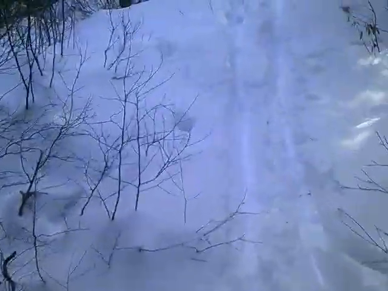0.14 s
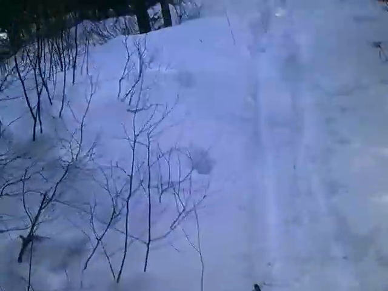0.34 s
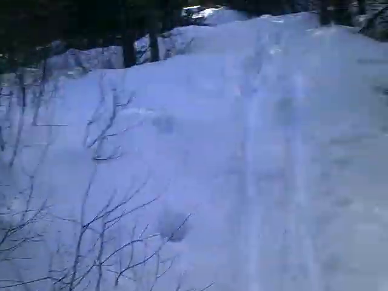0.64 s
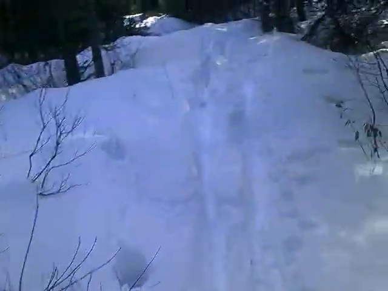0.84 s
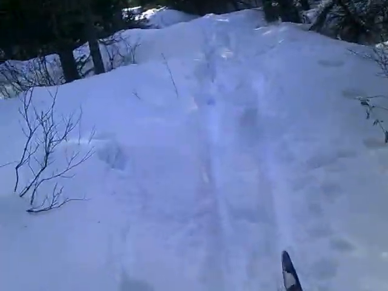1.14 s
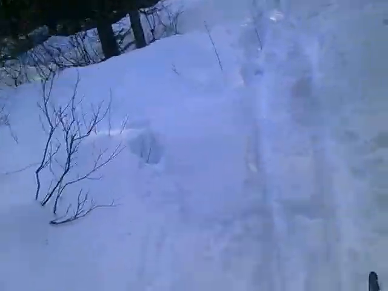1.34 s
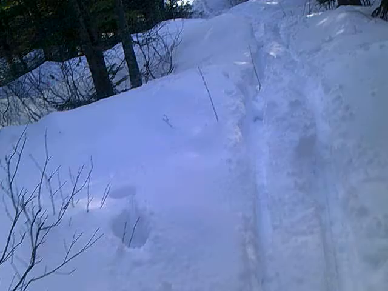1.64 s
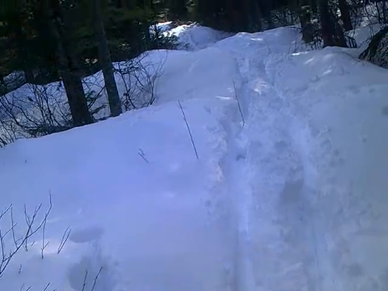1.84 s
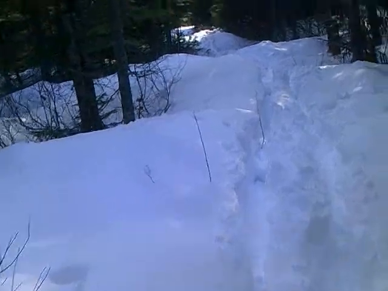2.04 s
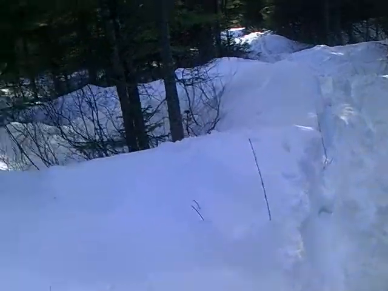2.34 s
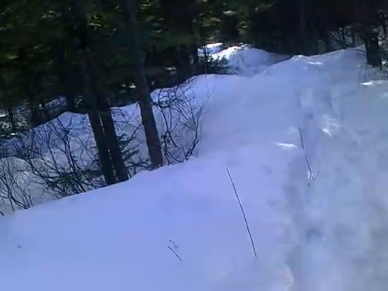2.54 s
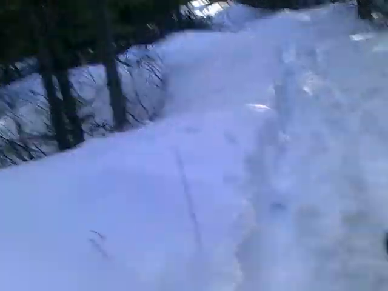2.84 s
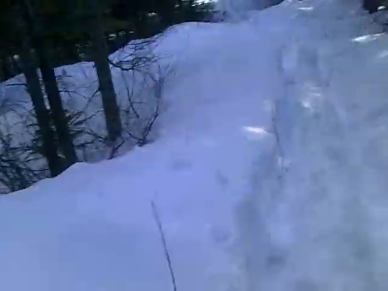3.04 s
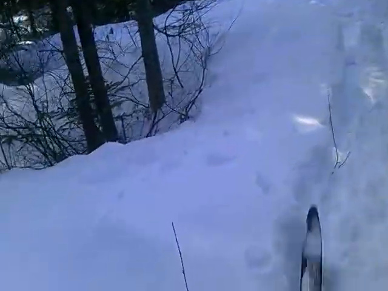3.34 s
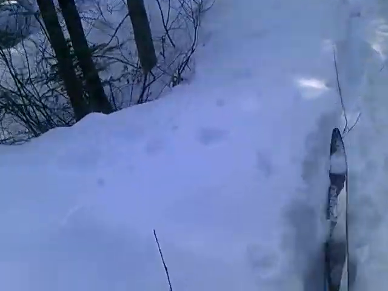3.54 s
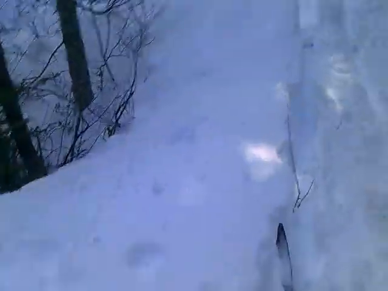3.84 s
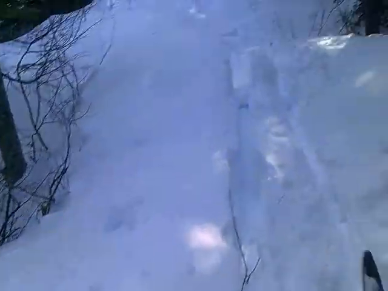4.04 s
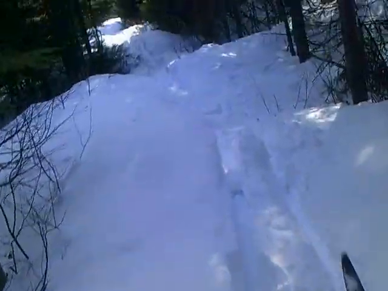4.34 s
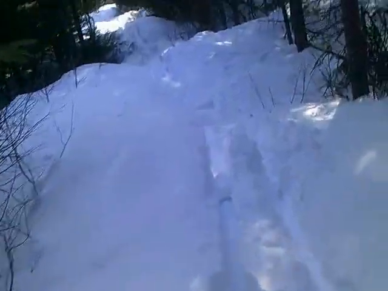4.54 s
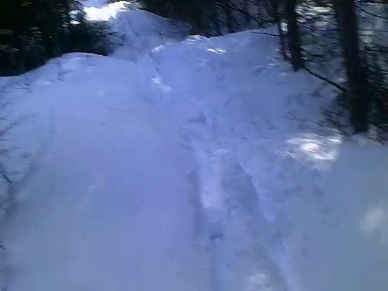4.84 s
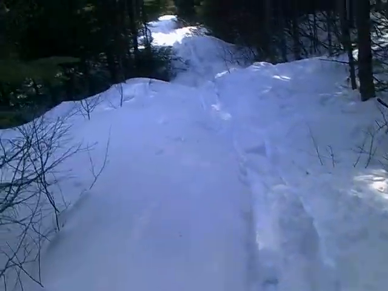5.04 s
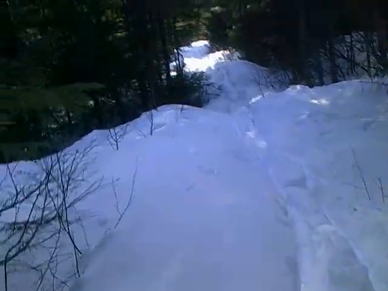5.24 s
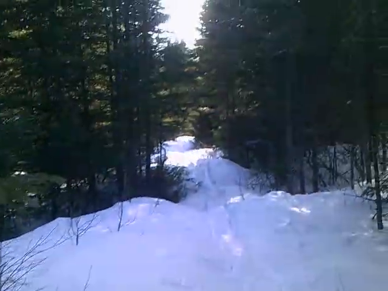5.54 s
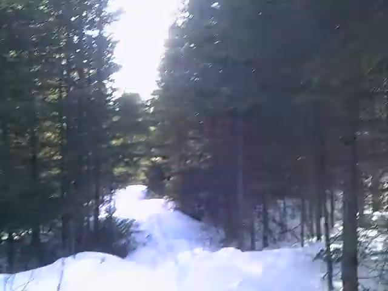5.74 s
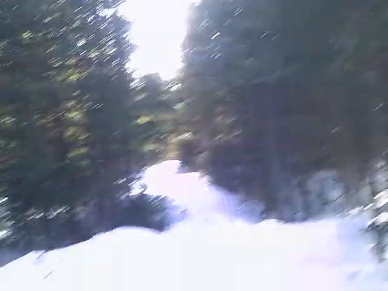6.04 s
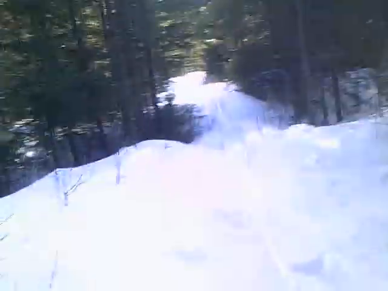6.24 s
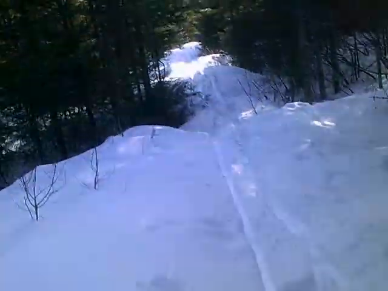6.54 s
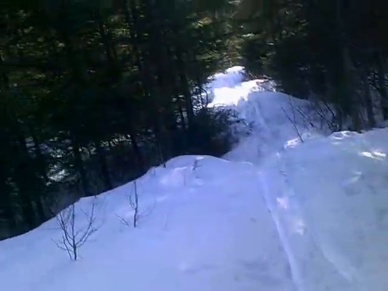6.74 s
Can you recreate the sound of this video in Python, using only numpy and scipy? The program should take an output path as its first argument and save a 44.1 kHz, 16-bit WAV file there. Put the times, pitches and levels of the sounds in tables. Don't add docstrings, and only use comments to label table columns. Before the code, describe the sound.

Muffled snow crunches underfoot while a loose strap and buckle snap, slap and scrape hard against a body-worn plastic camera housing.

```python
import sys
import numpy as np
from scipy import signal
from scipy.fft import rfft, irfft
from scipy.io import wavfile
from scipy.ndimage import uniform_filter1d

SR = 44100
rng = np.random.default_rng(int(sys.argv[2]) if len(sys.argv) > 2 else 0)


def unload_wav(signal):
    wavfile.write(
        sys.argv[1],
        SR,
        np.round(np.clip(np.atleast_2d(signal).T, -1, 1) * 32767).astype(np.int16),
    )


def voltage_ratio(level):
    return 10 ** (np.asarray(level, float) / 20)


N = 303496
TIME = np.arange(N) / SR

# [t/s, level/dB, crispness/dB]
SNOW_WEIGHT = [(0, -48.5, 8), (0.5, -36, 0), (0.9, -50, 3), (1.24, -38.5, -4), (1.48, -51, 5),
               (2.03, -38.5, -5), (2.64, -52.5, 8), (2.84, -32, -3), (3.04, -49, -1), (3.3, -44.5, 2),
               (3.68, -38.5, -3), (4.0, -46.5, 4), (5.1, -38.5, -2), (5.6, -40.5, 2.5), (5.82, -49, -2.2),
               (6.1, -39, 2.5), (6.45, -50.5, -0.5), (6.88, -47, 3.5)]
# [t/s, length/s, change/dB]
CRUNCH_SWELLS = [(0, .04, 6), (.55, .11, 5), (.93, .06, -7), (1.3, .05, -5), (1.45, .05, 4),
                 (2.21, .11, -6), (2.5, .08, -4), (3.31, .07, 5), (4.12, .14, -3), (4.46, .09, -3),
                 (4.77, .03, 6), (4.93, .06, 3), (5.16, .26, 3.5), (5.5, .09, -4), (5.72, .1, -3),
                 (6.4, .03, 4), (6.44, .06, -4)]
# [f/Hz, level/dB per Hz]
MUFFLE = [(150, -40), (250, -3.5), (460, 4.5), (540, 0.5), (840, 2.5), (970, -2), (1060, 1), (1290, -1),
          (1750, -14), (2280, -18.5), (3400, -22.5), (3900, -35), (5000, -47.5), (6000, -93)]
# [f/Hz, level/dB per Hz]
HISS = [(5000, -58.5), (5900, -3.5), (6800, 13), (7400, 11), (8100, 4), (9000, -50.5)]
# [t/s, level/dB]
AIR_PRESSURE = [(0, -14.5), (0.25, -38), (0.42, -20.5), (0.8, -37), (1.2, -25.5), (1.59, -41), (1.9, -30.5),
                (2.43, -30.5), (2.56, -40), (2.9, -16.5), (3.12, -36.5), (3.64, -23), (4.1, -38.5),
                (4.6, -24), (5.2, -31.5), (5.9, -33), (6.3, -23.5), (6.7, -39)]
# [t/s, change/dB, release/s]
LURCHES = [(0.535, 14.5, 0.06), (1.098, 4, .2), (1.859, 11.5, 0.049), (2.07, 25.5, 0.047),
           (2.759, 14.5, 0.087), (3.66, 14.5, 0.1), (4.551, 7.5, 0.073), (4.95, 2.5, .1),
           (5.269, 11, 0.083), (5.62, 9, .07), (3.22, 10.5, 0.091), (4.4, 11, .06), (6.2, -1, .2),
           (6.75, 7, .1), (.03, 4, .1), (.82, -5, .06), (2.25, -6, .12), (2.17, 5, .03), (3.9, -5, .05),
           (4.05, 8, .05), (4.2, -6, .12), (5.5, 7, .06), (.47, -6, .03)]
# [f/Hz, level/dB per Hz]
SWAY = [(2.4, -30), (5, -2), (14, -1.5), (24, -9), (33, -19.5), (48, -15.5), (70, -39.5)]
# [f/Hz, level/dB per Hz]
THUMP = [(18, -26.5), (40, -6.5), (75, -4.5), (170, -10), (330, -18), (700, -80.5)]
# [f/Hz, level/dB, t60/s]
HOUSING_MODES = [(520, -8, 0.019), (657, -10.5, 0.058), (780, -9.5, 0.042), (903, -4.5, 0.035),
                 (1101, -10, 0.054), (1263, -17.5, 0.059), (1400, -19, 0.03), (900, 6.5, 0.0044),
                 (1850, 2.5, 0.0082), (1565, -18, 0.052), (1629, -4.5, 0.016), (1831, -13.5, 0.022),
                 (2161, -4.5, 0.013), (2369, -9, 0.018), (2800, -17, 0.011), (3383, -14, 0.011),
                 (4500, -20, 0.0027), (6600, -27, 0.0017), (7000, -35, 0.006), (7310, -24, 0.0041)]
# [t/s, peak/dB, loudest ring f/Hz, sharpness/dB]
TAPS = [(0.0616, -27.5, 870, -10), (0.3182, -24, 530, -18), (0.4673, -37, 805, -8),
        (0.7093, -20, 1090, -11.5), (0.9095, -21.5, 976, -6.5), (1.2139, -20.5, 1230, -12),
        (1.2235, -21, 1050, -11), (1.2479, -32, 1050, -4), (1.2565, -20, 635, -24), (1.3738, -20, 870, -9),
        (1.399, -18, 920, -5), (1.8318, -22, 780, -8), (2.0443, -11.5, 1210, -5.5),
        (2.1647, -20, 1300, -30.5), (2.7078, -20.5, 706, -17), (2.8014, -20, 890, -15),
        (2.8166, -14.5, 864, -36), (2.8245, -12, 805, -5), (2.8472, -15.5, 1030, -12.5),
        (2.9568, -16, 950, -11.5), (3.0394, -21.5, 784, -19), (3.2725, -17.5, 500, -9.5),
        (4.1217, -23.5, 900, -18.5), (4.6558, -23, 970, -4), (5.4559, -18, 1290, -19),
        (5.6188, -18, 940, -12), (5.6918, -21.5, 1350, -16), (5.7108, -23, 885, -15.5),
        (6.041, -17, 660, -2.5), (6.2937, -25, 820, -12)]
# [t/s, peak/dB, loudest ring f/Hz, sharpness/dB, tick/dB]
SNAPS = [(0.4231, -7, 810, -9, -42), (0.5269, -5.5, 1170, 1, -33), (1.995, 5.5, 1106, -1, -22),
         (2.0024, -8.5, 980, -24, -50), (2.6819, -13, 906, -14.5, -37), (2.8394, -11.5, 795, -4.5, -38),
         (2.9059, 5, 1062, -18.5, -35), (2.9249, 7, 910, -6, -26), (2.9418, -9.5, 660, -19, -40.5),
         (3.4109, -6, 1070, 5, -19), (3.7071, -2.5, 525, -9, -44), (4.4054, -7, 896, -11.5, -43),
         (4.4209, -4, 556, -20.5, -44.5), (4.6308, -10, 1104, -20, -34), (4.6685, -7.5, 850, -12.5, -58),
         (5.0722, -8.5, 900, -8, -48), (5.1468, -12, 713, -8, -49), (5.6371, -16, 900, -11, -54),
         (6.2566, 9, 1000, 1, -26), (6.3233, -9, 770, -4, -25)]
# [t/s, peak/dB, loudest ring f/Hz, sharpness/dB, tick/dB]
SLAPS = [(1.0896, -2.5, 913, -6.5, -41), (1.1611, -9, 1003, -5, -32), (1.275, 2.5, 994, 1, -31),
         (1.359, -5.5, 1146, -7, -31), (1.4082, -16, 665, -14, -63), (2.0698, -1.5, 1057, -5.5, -24),
         (2.7389, 0, 1084, -.5, -22), (2.9109, -2.5, 802, -14, -40), (4.3079, -19, 840, -8, -54),
         (4.399, -12, 900, -11.5, -47), (4.6812, -13.5, 820, -4, -44), (5.212, -24, 1070, 4, -40),
         (5.268, 7, 1000, 2, -35), (6.0143, 2, 1080, -6.5, -48), (6.3384, 5.5, 835, 3.5, -18),
         (6.3487, 4, 1100, -6.5, -18)]
# [t/s, peak/dB, loudest ring f/Hz]
ZIP_TICKS = [(0.6585, -29.5, 1270), (1.3938, -18, 874), (1.592, -29, 867), (1.787, -31.5, 1240),
             (2.199, -26, 660), (2.7187, -34, 920), (2.887, -26, 945), (3.4642, -24.5, 876),
             (3.5256, -37, 1190), (3.6208, -32, 1110), (4.326, -28, 860), (6.141, -40, 1100),
             (3.548, -33, 1190), (3.992, -31.5, 1150), (4.069, -26.5, 1060), (4.228, -35, 900),
             (0.998, -32.5, 1005), (1.017, -31.5, 1090), (2.272, -31, 1080), (6.706, -27, 1340),
             (6.743, -34, 1050)]
# [from t/s, to t/s]
HELD = [
    (.4, .6),
    (2.001, 2.01),
    (3.4, 3.75),
    (6.3, 6.345),
]
# [t/s, peak/dB, loudest ring f/Hz, sharpness/dB, length/ms]
SWISHES = [(0.194, -28, 920, -14, 64), (0.224, -14, 860, 0, 21.6), (0.279, -30, 1310, -8.5, 17),
           (1.174, -31, 657, -8.5, 14), (2.317, -26.5, 1110, -18.5, 22), (3.137, -28.5, 1020, -16.5, 69),
           (3.246, -20.5, 615, -13, 25.4), (3.872, -21, 1120, -9, 49), (3.897, -29, 1100, -28, 16),
           (4.379, -17, 900, -14, 53), (4.554, -23.5, 1090, -19.5, 66), (4.707, -34.5, 560, 7, 30),
           (4.753, -25, 1360, -4, 9.1), (4.97, -20.5, 1215, -27.5, 76), (5.124, -24.5, 720, -28, 30),
           (6.525, -40.5, 3170, -4, 110), (1.19, -31, 1210, -9, 87), (6.64, -33.5, 1260, -14, 88)]
# [t/s, peak/dB, loudest ring f/Hz, sharpness/dB, length/ms]
SCRAPES = [(0.453, -22, 500, -33, 17), (0.896, -29.5, 905, -18.5, 13), (1.146, -20, 1090, -34, 33),
           (1.379, -17, 898, -27, 26), (1.617, -29, 870, -7.5, 21), (1.638, -22, 1310, -27, 34),
           (1.717, -28.5, 1320, -11, 7.9), (2.104, -23, 715, -24, 42), (2.165, -31, 1130, -8, 27),
           (2.429, -24.5, 910, -23.5, 22), (2.449, -18, 790, -21, 32), (2.8, -15, 902, -27, 55),
           (2.886, -10.5, 832, -12, 43), (2.963, -22, 1247, -16, 68), (3.225, -26, 1510, -9, 15),
           (3.394, -16, 1186, -15.5, 34), (3.613, -19, 1130, -29, 57), (4.294, -18.5, 813, -27, 50),
           (4.815, -22.5, 1140, -15, 6.1), (4.884, -18.5, 980, -16.5, 55), (5.602, -23, 1100, -23, 105),
           (6.87, -12, 1140, -17, 140)]
# [t/s, peak/dB, ring f/Hz, length/ms]
SQUEAKS = [
    (6.525, -26.5, 1310, 89),
    (6.553, -27, 1066, 54),
]
# [t/s, length/s, level/dB]
SLEEVE_PASSES = [(.195, .025, -64), (.222, .04, -57), (.262, .05, -61), (.412, .01, -66), (1.1, .025, -64),
                 (1.145, .015, -63), (1.175, .025, -60), (2.255, .03, -68), (2.315, .03, -67),
                 (2.575, .03, -69), (2.79, .025, -58), (2.818, .035, -60), (2.93, .05, -63),
                 (3.15, .03, -70), (3.25, .03, -66), (3.615, .06, -61), (3.862, .055, -61),
                 (3.95, .03, -68), (4.39, .06, -56), (4.555, .045, -58), (4.612, .03, -63),
                 (4.712, .025, -63), (4.745, .025, -62), (5.003, .025, -66), (5.12, .04, -59),
                 (5.17, .008, -64), (5.19, .01, -62), (5.208, .014, -60), (5.228, .025, -64),
                 (5.74, .07, -68), (6.045, .035, -65), (6.135, .025, -67), (6.222, .03, -66),
                 (6.525, .095, -69)]
# [f/Hz, level/dB per Hz]
SLEEVE_BODY = [(1500, -20), (2300, 0), (3400, -1), (4300, -6), (5200, -30)]
# [t/s, peak/dB, f/Hz,
# t60/s]
PINGS = [(5.2715, -2.5, 775, .03), (5.268, -3, 2000, .012), (5.271, -9, 2380, .02), (5.271, -10, 1510, .03),
         (5.273, -13, 1110, .04), (5.271, -16, 3300, .012), (6.0143, -5, 2180, .012),
         (6.0165, -11, 1640, .02), (6.0165, -8, 2300, .017), (6.0215, -10, 680, .04),
         (6.2566, 0, 2020, .015), (6.259, 0, 800, .03), (6.262, -6, 662, .05), (6.342, -7, 1000, .03),
         (6.3425, -12, 2500, .015), (6.3535, -3, 760, .03), (6.353, -12, 2100, .015),
         (1.275, -10, 1640, .02), (1.2752, -5, 2200, .014), (2.7389, -20, 3900, .008),
         (1.2755, -5, 980, .035), (2.908, -10, 2000, .01), (2.9249, -4, 900, .015),
         (1.0896, -14, 1400, .02), (2.4755, -18, 900, .02), (2.4757, -27, 1900, .012),
         (2.432, -32, 2500, .012), (4.4255, -10, 640, .025), (1.645, -27, 1900, .03),
         (0.472, -22, 950, .025), (5.672, -30, 2200, .015)]
# [t/s, peak/dB, f/Hz]
BUMPS = [(0.519, -23, 66), (0.56, -35, 94.2), (0.594, -41, 56), (0.618, -32, 83.4), (1.063, -20.5, 137),
         (1.074, -36.5, 56.5), (1.849, -21, 56.5), (2.05, -21, 61.9), (2.082, -18.5, 61.3),
         (2.104, -18, 56.5), (2.757, -18, 79), (2.767, -13.5, 96), (2.799, -37, 110), (2.844, -16, 123),
         (3.039, -41, 56.5), (3.473, -23.5, 170), (3.616, -16, 266), (3.654, -15, 70.0), (3.669, -19, 56.5),
         (3.708, -14, 262), (3.789, -23.5, 180), (5.268, -14.5, 131), (2.091, -17, 130), (1.853, -28, 240),
         (1.8, -28, 95), (2.16, -25, 160), (1.995, -17, 220), (4.42, -17, 330), (0.53, -24, 180)]
# [f/Hz, level/dB]
CONVERTER = [(2400, -0.02), (3000, -2.5), (4600, -13.5), (5400, -30), (6200, -9), (8000, -6.5), (8500, -51),
             (18000, -45)]

SHARP_FROM_HZ, TICK_FROM_HZ = 1587, 5500
STIFF_HZ = 230
CRISP_DB, HISS_DB, HISS_PER_CRISP = -7, -39, 0.42
REST_DB, REST_HISS_DB = -58.5, -82.5
SWELL_EDGE_S, HISS_EDGE_S = .02, .008
LURCH_ATTACK_S, THUMP_DB, THUMP_PER_AIR = .04, -34.5, 0.33
SNAP_MS, SLAP_MS, TAP_MS = 0.66, 3.16, 1.2
TAP_TICK_DB, ZIP_SHARP_DB, CONTACT_ROUGH = -36.5, -3, .075
HELD_RING, RUBBED_RING = 0.52, 0.51
SCRAPE_HISS_DB, SWISH_HISS_DB = -61, -52
SQUEAK_RING_DB, SQUEAK_T60_S, SQUEAK_SHARP_DB = 4.5, 0.16, -8
SLEEVE_BODY_DB, SLEEVE_DB = 5, -3.5
OVERLOAD = 0.9


def unit(x):
    return x / np.sqrt(np.mean(x ** 2))


def colour(x, points):
    hz, db = np.transpose(points)
    grid = np.fft.rfftfreq(8192, 1 / SR)
    level_db = np.interp(np.log(grid + 1), np.log(hz), db, left=-90, right=-130)
    cepstrum = irfft(np.log(voltage_ratio(level_db)))
    cepstrum[1:4096] *= 2
    cepstrum[4097:] = 0
    response = irfft(np.exp(rfft(cepstrum)))
    return unit(signal.fftconvolve(x, response)[:N])


def curves(table):
    s, *columns = np.transpose(table)
    return [np.interp(TIME, s, c) for c in columns]


def walk(rate):
    hold = int(SR / rate)
    levels = rng.standard_normal(4000)[:N // hold + 1]
    steps = np.repeat(levels, hold)
    slewed = uniform_filter1d(uniform_filter1d(steps, hold), hold)
    return unit(slewed[:N])


def grains(rate, scatter_db, bed):
    chance, size, noise = rng.random(N), rng.exponential(size=N), rng.standard_normal(N)
    clicks = (chance < rate / SR) * np.sign(noise) * voltage_ratio(scatter_db * np.minimum(size, 3))
    return unit(unit(clicks) + bed * noise)


def spell(s, length, edge_s):
    return np.clip(np.minimum(TIME - s, s + length - TIME) / edge_s + .5, 0, 1)


def damped_mode(t, hz, t60):
    return np.exp(-np.log(1000) * t / t60) * (1 - np.exp(-2 * hz * t)) * np.sin(2 * np.pi * hz * t)


def ring(own_hz, sharp_db, tick_db, luck, own_db=0., own_t60=0.027, share=1):
    hz, db, t60 = np.transpose(HOUSING_MODES + [(own_hz, own_db, own_t60)])
    treble_db = np.where(hz > TICK_FROM_HZ, tick_db, (hz > SHARP_FROM_HZ) * sharp_db)
    db = db + 2 * luck[0] + treble_db
    hz = hz * (1 + 0.0035 * luck[1])
    t = TIME[:int(.09 * SR), None]
    return np.sum(voltage_ratio(db) * np.sign(luck[2]) * damped_mode(t, hz, share * t60), axis=1)


def add(out, s, sound, db):
    i = int(s * SR)
    sound = sound[:N - i] * voltage_ratio(db) / np.abs(sound).max()
    out[i:i + len(sound)] += sound


def crunch():
    body_db, crisp_db = curves(SNOW_WEIGHT)
    body_db = body_db + sum(db * spell(s, length, SWELL_EDGE_S) for s, length, db in CRUNCH_SWELLS)
    sharp_db = body_db + crisp_db + CRISP_DB
    hiss_db = body_db + HISS_PER_CRISP * crisp_db + HISS_DB
    grit = grains(500, 2.0, bed=1.0)
    shared = 2.3 * walk(60)
    muffled = colour(grit, MUFFLE)
    low = signal.sosfilt(signal.butter(4, SHARP_FROM_HZ, fs=SR, output="sos"), muffled)
    high = signal.sosfilt(signal.butter(4, SHARP_FROM_HZ, "high", fs=SR, output="sos"), muffled)
    out = unit(low) * voltage_ratio(body_db + shared + 2.7 * walk(30))
    out += unit(high) * voltage_ratio(sharp_db + shared + 0.57 * walk(35))
    out += colour(rng.standard_normal(N), MUFFLE[3:]) * voltage_ratio(REST_DB)
    hiss_gain = voltage_ratio(hiss_db + shared + 1.5 * walk(25)) + voltage_ratio(REST_HISS_DB)
    return out + colour(grit, HISS) * hiss_gain


def air():
    sway_db, = curves(AIR_PRESSURE)
    swell_db = np.zeros(N)
    for s, db, release in LURCHES:
        slope_s = np.where(TIME < s, LURCH_ATTACK_S, release)
        swell_db += db * np.exp(-np.abs(TIME - s) / slope_s)
    thump_db = THUMP_DB + THUMP_PER_AIR * sway_db + swell_db
    sway = colour(rng.standard_normal(N), SWAY) * voltage_ratio(sway_db)
    thumps = colour(grains(150, 1.1, bed=0.8), THUMP) * voltage_ratio(thump_db + 1.8 * walk(13))
    return sway + thumps


def knocks():
    hits = [k + (SNAP_MS,) for k in SNAPS]
    hits += [k + (SLAP_MS,) for k in SLAPS]
    hits += [k + (TAP_TICK_DB, TAP_MS) for k in TAPS]
    hits += [k + (ZIP_SHARP_DB, TAP_TICK_DB, TAP_MS) for k in ZIP_TICKS]
    out, t = np.zeros(N), TIME[:1024]
    luck = rng.standard_normal((len(hits), 3, len(HOUSING_MODES) + 1))
    rough = rng.standard_normal((100, len(t)))
    for k, (s, db, hz, sharp_db, tick_db, ms) in enumerate(hits):
        contact = CONTACT_ROUGH * rough[k] * np.exp(-(t / (abs(ms) / 1000 + 1e-4)) ** 2)
        contact[0] = 1
        share = HELD_RING if any(a < s < b for a, b in HELD) else 1
        response = ring(hz, sharp_db + 2.0, tick_db + 26.5, luck[k], share=share)
        add(out, s, signal.fftconvolve(response, contact), db)
    return signal.sosfilt(signal.butter(2, STIFF_HZ, "high", fs=SR, output="sos"), out)


def scrapes():
    slips = [k + (SCRAPE_HISS_DB, 3.0, .025) for k in SCRAPES]
    slips += [k + (SWISH_HISS_DB, 3.1, .026) for k in SWISHES]
    for s, db, hz, ms in SQUEAKS:
        slips.append((s, db, hz, SQUEAK_SHARP_DB, ms, SWISH_HISS_DB, SQUEAK_RING_DB, SQUEAK_T60_S))
    out, t = np.zeros(N), TIME[:8192]
    luck = rng.standard_normal((len(slips), 3, len(HOUSING_MODES) + 1))
    rough = rng.standard_normal((len(slips), len(t)))
    rough = rough * np.abs(rough)
    for k, (s, db, hz, sharp_db, ms, hiss_db, own_db, own_t60) in enumerate(slips):
        x = t / (abs(ms) / 1000)
        slip = rough[k] * np.minimum(x * 15, 1) / (1 + x ** 6)
        response = ring(hz, sharp_db + 11.5, hiss_db + 43.0, luck[k], own_db, own_t60, RUBBED_RING)
        add(out, s, signal.fftconvolve(response, slip), db)
    return out


def sleeve():
    gate = sum(voltage_ratio(db + SLEEVE_DB) * spell(s, length, HISS_EDGE_S) for s, length, db in SLEEVE_PASSES)
    grit = grains(900, 2.0, bed=1.5)
    fabric = colour(grit, HISS) + voltage_ratio(SLEEVE_BODY_DB) * colour(grit, SLEEVE_BODY)
    return gate * voltage_ratio(2.5 * walk(90)) * fabric


def pings():
    out, t = np.zeros(N), TIME[:4096]
    for s, db, hz, t60 in PINGS:
        add(out, s, damped_mode(t, hz, t60), db)
    return out


def bumps():
    out, t = np.zeros(N), TIME[:4096]
    sign = np.sign(rng.standard_normal(len(BUMPS)))
    for k, (s, db, hz) in enumerate(BUMPS):
        push = np.sin(2 * np.pi * hz * t) * hz * t * np.exp(-2.4 * hz * t)
        add(out, s, sign[k] * push, db - 3.5)
    return out


def scene():
    mix = knocks() + scrapes() + crunch() + air() + bumps() + sleeve() + pings()
    return mix[None]


def roll_off(x):
    return signal.sosfilt(signal.butter(12, 17650, fs=SR, output="sos"), x)


def record(dry):
    hz, db = np.transpose(CONVERTER)
    grid = np.fft.rfftfreq(N, 1 / SR)
    gain = voltage_ratio(np.interp(np.log(grid + 1), np.log(hz), db))
    overloaded = np.clip(dry, -OVERLOAD, OVERLOAD)
    mix = np.clip(irfft(rfft(overloaded) * gain, N), -1, 1)
    return roll_off(mix)


dry = scene()
out = record(dry)
unload_wav(out)
```